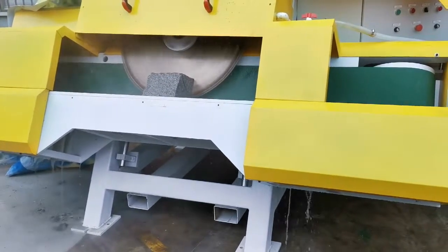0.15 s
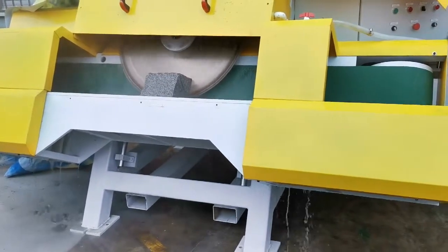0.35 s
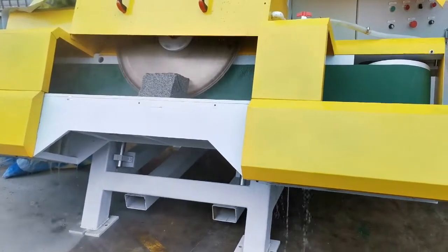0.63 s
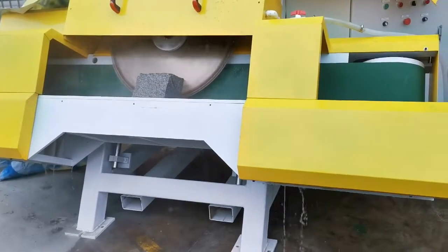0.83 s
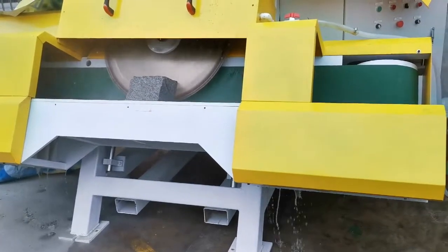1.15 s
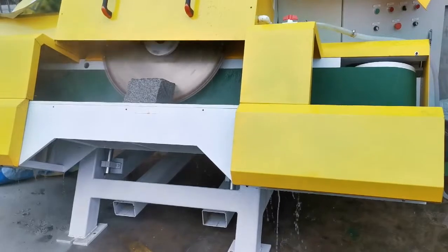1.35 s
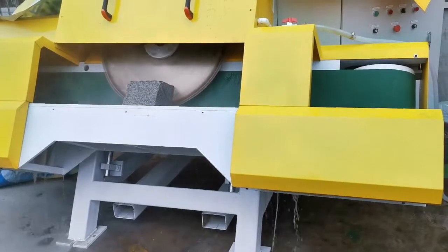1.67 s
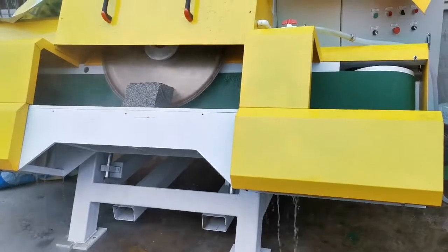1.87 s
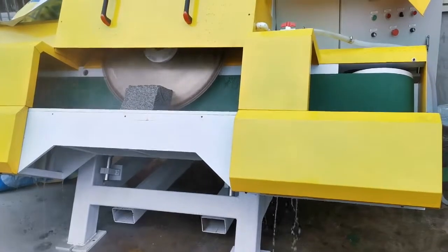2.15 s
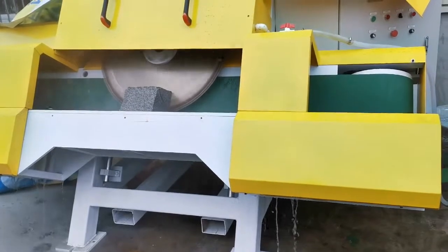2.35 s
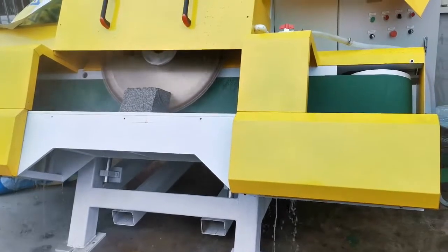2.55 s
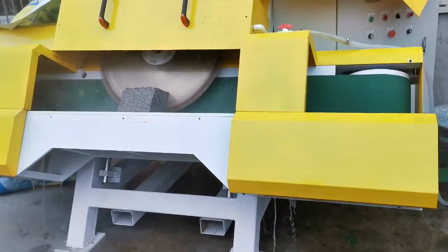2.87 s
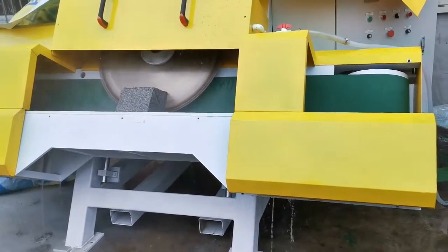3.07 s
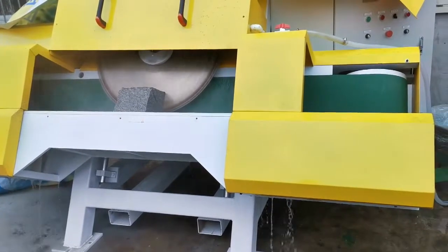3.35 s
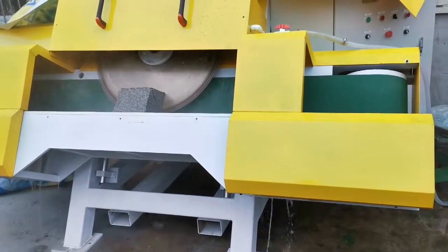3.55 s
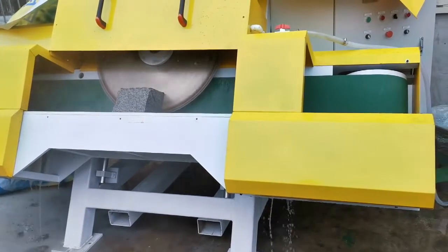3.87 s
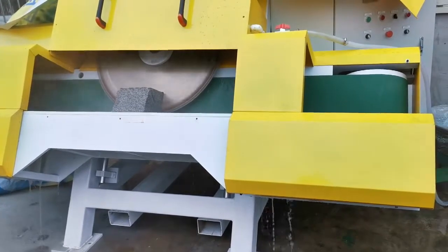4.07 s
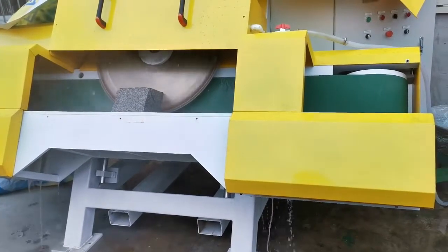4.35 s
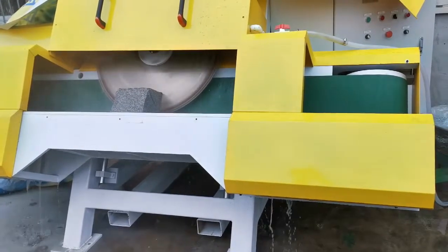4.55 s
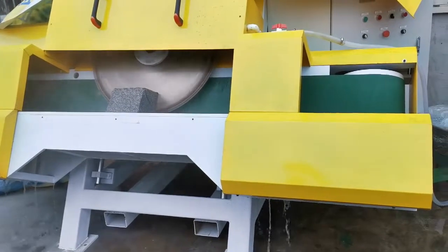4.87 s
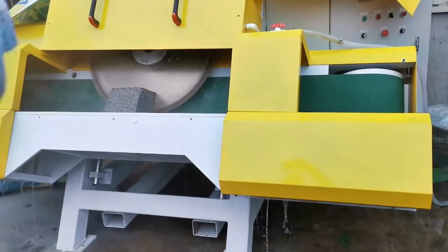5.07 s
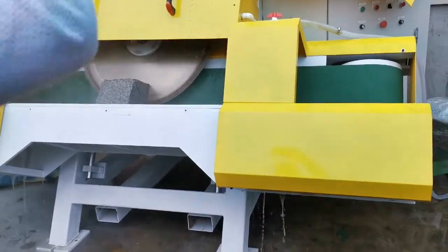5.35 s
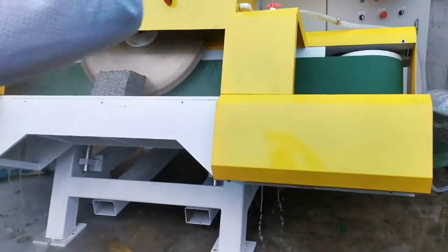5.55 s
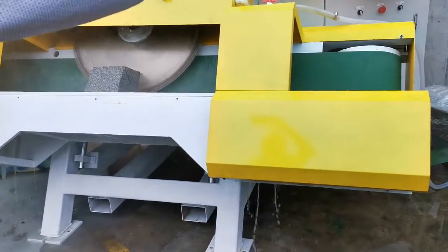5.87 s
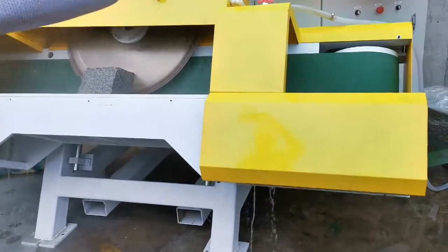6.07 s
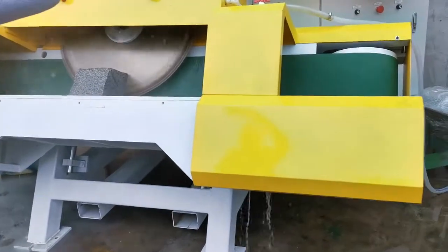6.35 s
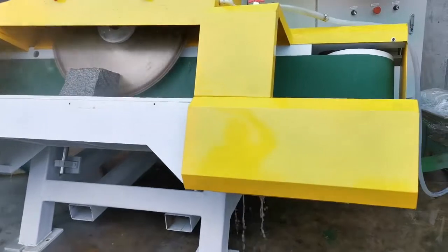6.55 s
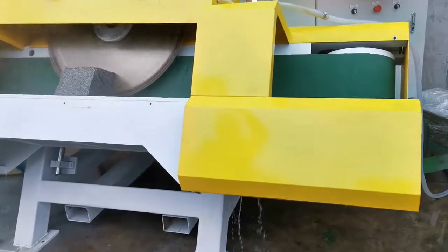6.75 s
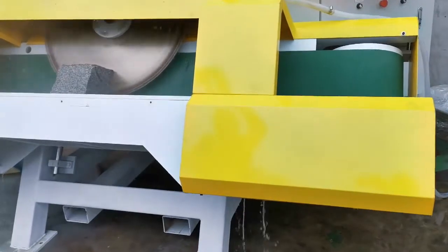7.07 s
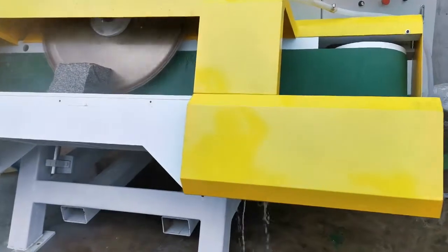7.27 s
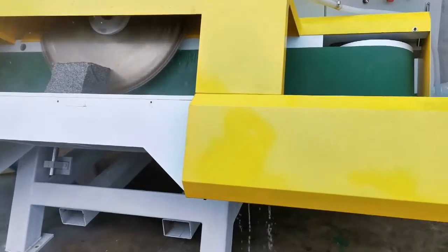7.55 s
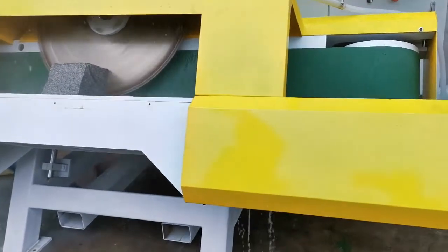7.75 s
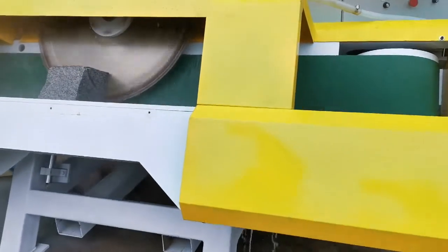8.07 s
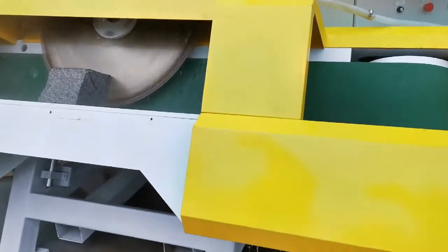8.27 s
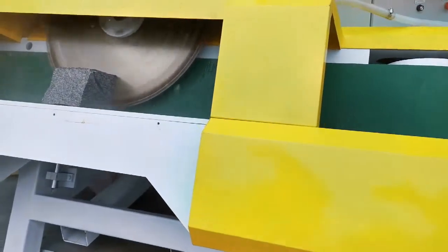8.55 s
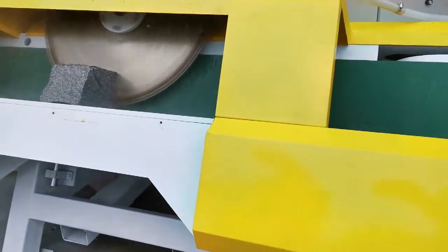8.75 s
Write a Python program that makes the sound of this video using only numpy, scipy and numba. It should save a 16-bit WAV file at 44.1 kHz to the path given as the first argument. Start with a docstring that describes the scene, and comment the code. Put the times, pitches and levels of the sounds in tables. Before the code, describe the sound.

Steady stone sawing from start to finish: a dense, harsh midrange rasp with whining, wavering metal resonances and a quick once-per-turn flutter. A soft low frame hum sits under it, with high water spray above and small dull thuds of wind or handling. The ringing grows more piercing in the later part. Close phone pickup in a factory hall, left side crisp, right side muffled.

```python
"""A large circular blade grinds through a wet stone block; its rim scrapes almost alike on every turn.
The scraping is noise that partly recurs each turn; it drives resonances of blade, guard and frame,
and steady tones sing out over them. Cooling water fizzes off the rim; low gusts and thuds rumble below.
Place: a factory hall. Microphone: a hand-held phone a metre away, its left port open to the treble,
its right port muffled but resonant."""
import sys
import numpy as np
from scipy import signal
from scipy.fft import rfft, irfft, next_fast_len
from scipy.io import wavfile
from scipy.ndimage import uniform_filter1d, map_coordinates
from numba import njit

SR = 44100
rng = np.random.default_rng(int(sys.argv[2]) if len(sys.argv) > 2 else 0)


def digitize_waveform(pressure):
    """Quantize a signal to 16-bit integers and store it at the path in sys.argv[1].

    Rows of a 2-D input are taken as channels; values are limited to [-1, 1].
    """
    field = np.atleast_2d(pressure).T
    bounded = np.clip(field, -1, 1)
    quanta = np.round(bounded * 32767).astype(np.int16)
    wavfile.write(sys.argv[1], SR, quanta)


N = 393372
TURN = 2651  # samples in one turn of the blade
HZ = np.fft.rfftfreq(2 * next_fast_len(N // 2 + 1, True), 1 / SR)  # filter bins


def undb(db):
    """Decibels to gain."""
    return 10 ** (np.asarray(db) / 20)


def curves(table):
    """Table columns at every sample."""
    s, *columns = np.transpose(table)
    return [np.interp(np.arange(N) / SR, s, c) for c in columns]


def over_hz(table):
    """Table columns at every frequency bin, straight lines over log frequency."""
    hz, *columns = np.transpose(table)
    return np.array([np.interp(np.log(HZ + 1), np.log(hz), c) for c in columns])


def shape(x, gain):
    """Filter by a gain for each frequency bin."""
    return irfft(rfft(x, 2 * len(HZ) - 2) * gain)[..., :N]


def below(hz):
    """Gain per bin of a steep low-pass."""
    return 1 / (1 + (HZ / hz) ** 16)


def unit(x):
    """Scale so that the mean of the channels has rms 1."""
    return x / np.sqrt(np.mean(np.mean(x, axis=0) ** 2))


def walk(rate):
    """Random levels held about 1 / rate s and slewed twice; spread near 1."""
    step = 64  # samples between computed points
    k = int(SR / rate / step)
    held = np.repeat(rng.standard_normal(N // step // k + 2), k)
    slow = 1.47 * uniform_filter1d(uniform_filter1d(held, k), k)
    return np.interp(np.arange(N) / step, np.arange(len(slow)), slow)


def swells(events, rest_db):
    """Gain over time: smooth humps on a resting level, summed as powers."""
    t = np.arange(0, N, 64) / SR
    power = undb(2 * rest_db)
    for middle, length, peak_db in events:
        hump = np.cos(np.pi * np.clip((t - middle) / length, -.5, .5)) ** 4
        power = power + undb(2 * peak_db) * hump
    return np.interp(np.arange(N) / SR, t, np.sqrt(power))


# Low gusts and thuds on the phone, before the lift of the deepest part.
# Each row: middle in seconds, length in seconds, peak level in dB.
GUSTS = [(.45, 0.091, -56), (.78, 0.65, -51), (1.1, 0.33, -58), (1.37, 0.45, -52), (1.55, 0.16, -54),
         (1.68, 0.32, -50.5), (1.87, 0.16, -56), (2.0, 0.13, -55), (2.2, .2, -57), (2.5, 0.75, -58.5),
         (2.88, 0.17, -57), (3.15, 0.1, -66), (4.18, 0.25, -56), (4.75, 1.1, -56.5), (5.45, .15, -59),
         (5.85, 0.98, -58.5), (6.1, 0.18, -59), (7.04, 0.19, -56), (7.33, 0.2, -56), (7.45, .12, -60),
         (7.72, 0.34, -58), (8.14, 0.3, -52), (8.46, 0.17, -55)]
# Colour of the rumble. Each row: frequency in Hz, relative level in dB.
RUMBLE_COLOUR = [(20, -15), (40, -8), (100, -1), (170, 0), (250, -10), (400, -35)]
# Lift of the deepest rumble. Each row: time in seconds, lift in dB.
DEEP_LIFT = [(0, 12), (1, -6), (2.8, -5), (3.45, 7), (4.1, 5), (5.5, 6), (7.9, 7), (8.9, -1)]


def rumble():
    """Low gusts and handling: noise partly shared by the ports, stronger on the left, deep and upper apart."""
    rest_db, flicker_db = -67.5, 0.5  # level between the gusts, spread of the flicker
    shared, left, right = shape(rng.standard_normal((3, N)), undb(over_hz(RUMBLE_COLOUR)[0]))
    both = unit(np.array([undb(1.0) * (shared + left), undb(-2.5) * (shared + right)]))
    deep = shape(both, 1 / (1 + (HZ / 60) ** 6))
    upper = both - deep
    deep_gain = undb(curves(DEEP_LIFT)[0] + flicker_db * walk(21))
    upper_gain = undb(flicker_db * walk(21))
    return swells(GUSTS, rest_db) * (deep * deep_gain + upper * upper_gain)


# Throb once a turn, before each layer's own scale. Each row: time in seconds, depth in dB.
BITE = [(0, 1.8), (1.5, 1), (2.8, 1.23), (3.5, 1.27), (4.6, 1.44), (5.4, -0.6), (6.4, 1.5), (7.7, 1.5),
        (8.2, 1), (8.9, 1.5)]


def throb(scale):
    """Gain of a blade slightly out of true, which bites harder once a turn; a second harmonic skews the bite."""
    depth_db = curves(BITE)[0]
    angle = 3.73 - 0.13 * np.arange(N) / SR  # rad; the hardest bite slips slowly round the turn
    turn = 2 * np.pi * np.arange(N) / TURN + angle
    return undb(scale * depth_db * (np.cos(turn) + 0.38 * np.cos(2 * turn + 0.28)))


# Colour of the water at the ports. Each row: frequency in Hz, left and right relative level in dB.
SPRAY_COLOUR = [(8000, -20, -30), (10500, -4, -20), (11500, -2, -18), (13000, -7, -23), (15000, -11, -33)]


def spray():
    """Cooling water flung off the rim: a fine high noise fizz, in bands of randomly wavering level."""
    out, colour = 0, undb(over_hz(SPRAY_COLOUR))
    for hz in (9500, 10800, 12100, 13400, 14700):
        band_gain = colour * np.exp(-((HZ - hz) / 900) ** 2)
        band = shape(rng.standard_normal((2, N)), band_gain)
        out = out + band * undb(1.1 * walk(10) + 2.7 * walk(30))
    level_db = np.linspace(-55.5, -58.5, N)
    return unit(out) * undb(level_db) * throb(1.3)


# Turn orders that sound beside a tone. Each row: offset in orders, relative level in dB.
NEIGHBOURS = [(-2, -9), (-1, -4), (1, 0), (2, -5), (3, -10)]


def beating(rough):
    """Complex gain of a tone with neighbouring turn orders, drifting in phase, so it flutters once a turn."""
    at = np.arange(0, N + 32, 32)
    order, db = np.transpose(NEIGHBOURS)
    steps = rng.standard_normal((len(NEIGHBOURS), len(at)))
    start = 2 * np.pi * rng.random((len(NEIGHBOURS), 1))
    drift = np.cumsum(steps, axis=1) * .09 + start
    orders = np.exp(1j * (2 * np.pi * np.outer(order, at) / TURN + drift))
    near = undb(db) @ orders / np.linalg.norm(undb(db))
    return np.interp(np.arange(N), at, np.sqrt(1 - rough) + np.sqrt(rough) * near)


# Steady tones of frame and blade, and a low hum at 99.8 Hz. Each row: frequency in Hz, left minus right in dB,
# phase wander in rad, how strongly it follows the bite (exponent), share of neighbouring turn orders 0-1.
TONES = [(266.1, 6.3, .8, 1.6, 0), (299.4, 6, .9, 1.6, 0), (365.9, 7.4, 1.3, 1, .15),
         (598.8, 4.4, 1., 1, 0), (731.9, 1.6, .6, .8, .1), (1330.6, -.6, 1.4, 1., .25),
         (2163.6, -4.3, 2., 1.6, .25), (2362.1, -6.7, 3.5, 1.8, .6), (3478.5, -11, 4.5, 4.5, .35),
         (3678.7, -10.3, 2.5, .8, .2), (4521.5, -11.5, 8., 3, .6), (99.8, 4, .8, 1, 0),
         (3040, -10, 4., 3.5, .4), (3550, -10, 4.5, 3.5, .4), (1064.6, 1, 1., 1, .2),
         (4620, -10, 6., 3, .7), (5390, 3, 6., 4.5, .3), (2415, -7, 3., 2.5, .7), (2510, -7, 4., 3.5, .4),
         (2931, -9, 2., 2, .4), (2665, -8, 3., 2, .6), (3245, -10, 3., 4, .3), (4860, -6, 7., 3, .8),
         (4975, -3, 7., 3, .8), (4378, -11, 5., 2.5, .6), (2778, -6, 4., 2.5, .6), (3876, -10, 4., 2.5, .5),
         (1763.3, 1.5, 1.5, 1, .2), (1896.4, -2, 1.5, 1, .2), (6458, 15, 3., 1, .3)]
# Level of each tone in turn between its swells, in dB, before throb and flicker.
TONE_REST_DB = [-62, -60, -71, -58, -83, -67.5, -54, -49.5, -58, -60, -66, -80, -70, -69, -70, -71, -53.5,
                -50, -55, -67, -46, -79, -66, -55, -64, -52, -50, -73, -53.5, -113]
# One list of swells for each tone in turn, before throb and flicker.
# Each row: middle in seconds, length in seconds, peak level in dB.
TONE_SWELLS = [
    [(.4, 0.31, -50), (1.35, 0.27, -50), (2.1, 0.95, -52), (4.3, 4.1, -51), (7, 1.3, -57.5),
     (7.9, 1.4, -55)],
    [(1.85, 0.77, -55), (3.9, 0.72, -59), (5.8, 1., -53), (7.7, 1.9, -51.5)],
    [(2, 2.5, -52), (3.8, 2.4, -50.5), (4.8, 3.3, -50.5), (5.5, 0.51, -53), (6.25, 0.82, -53),
     (7.7, 0.63, -53)],
    [(.3, 1., -66), (2, 1.9, -49.5), (2.75, 1.8, -51.5), (4.1, 0.97, -53), (4.8, 0.85, -54.5),
     (7.5, 1, -61)],
    [(.3, 2.7, -50), (1.75, 1.8, -54.5), (3.1, 2.2, -60), (4.1, 1.2, -56), (4.9, 1.2, -54), (5.7, 1.1, -53),
     (7.5, 1.2, -51)],
    [(.5, 2.1, -51.5), (3.75, 1.1, -56), (4.5, 0.41, -50), (7.4, 5.5, -53)],
    [(2.2, 1.5, -46.5), (4.2, 0.75, -47), (5.7, 0.56, -42), (6.3, .5, -46), (8.2, 0.75, -44),
     (8.8, 0.94, -39)],
    [(1.0, 1.8, -45), (1.6, 1.4, -42), (2.1, 1.2, -42), (2.5, 0.77, -42.5), (3.9, 2.1, -43),
     (5.3, 0.76, -47), (5.75, 0.6, -40), (6.25, 1.1, -34.5), (7.65, 0.6, -39), (8.5, 0.98, -47)],
    [(1.8, .6, -49), (3.7, .5, -42), (6.5, 0.73, -41), (7.03, 0.24, -36.5), (7.45, 0.33, -42),
     (7.7, 0.49, -37), (8.4, 0.42, -38)],
    [(5.85, .6, -43), (6.5, .9, -39), (7.0, .6, -39), (7.3, 0.7, -36), (7.58, 0.65, -34), (8.0, 0.5, -39)],
    [(.4, 1.1, -48), (1.5, 0.73, -40.5), (3.1, 3.5, -41), (3.9, 0.79, -42), (4.4, 1.7, -45),
     (5, 1.5, -40.5), (5.8, 0.27, -41), (7.5, 0.54, -57)],
    [(.75, 0.65, -63), (2.2, 0.58, -62), (4.7, 1.7, -61.5), (5.9, 1.75, -60.5), (8.1, 0.55, -67)],
    [(2.7, 1.5, -54), (4.2, 1.2, -58), (6., 1.9, -41), (8.2, 1.3, -44)],
    [(1.5, 1.4, -48), (4., 0.75, -50), (6.95, 0.85, -41), (7.6, 0.8, -39), (8.45, 0.51, -39)],
    [(3.8, .6, -54), (4.7, 1.2, -62), (5.4, 1, -57)],
    [(3, 1.7, -39.5), (7.4, 0.56, -56)],
    [(3, .8, -66.5), (7.1, 1, -50), (8, 1, -42), (8.5, 0.57, -40.5), (8.85, 0.52, -43)],
    [(1., .8, -46), (1.9, 0.93, -43)],
    [(1.7, 1.2, -48), (5.65, 0.72, -48), (8.1, 0.46, -38.5), (8.45, 0.75, -44.5), (8.85, .3, -51)],
    [(8.15, .5, -46), (8.5, 0.32, -40), (8.7, 0.18, -45)],
    [(2.35, .4, -43), (5.9, 0.59, -44), (6.9, 0.41, -49), (8.8, 0.44, -43)],
    [(7.05, 0.66, -43), (7.7, 0.79, -39.5)],
    [(2.8, 0.27, -44), (3.1, 0.7, -40), (8.1, .5, -48)],
    [(2.8, 0.2, -41), (3.1, 0.44, -43)],
    [(2, 1., -45), (3., 1, -47), (3.6, 0.53, -43), (5.8, .6, -51.5)],
    [(.2, 1.24, -42)],
    [(1.3, 1.2, -46), (2.4, 0.87, -43), (4.2, 1, -45)],
    [(.5, 1.2, -61), (6.4, 0.64, -51), (7.7, .9, -52), (8.5, 1.2, -55)],
    [(.3, 0.77, -55), (1.5, .9, -56), (7., 3., -62)],
    [(6.8, 1.5, -55), (8., 2.5, -45)],
]


def tones(lag_ms):
    """Sine tones of frame and blade, and a low hum, sing out; the phase wanders, a little differently at each
    port."""
    out, t, turn = 0, np.arange(N) / SR, throb(0.74)
    for tone, events, rest_db in zip(TONES, TONE_SWELLS, TONE_REST_DB):
        hz, pan_db, wander, bite, rough = tone
        left = 2 * np.pi * hz * t + wander * walk(6)
        right = left - 2 * np.pi * hz * lag_ms / 1000 + 0.17 * wander * walk(4)
        phases = np.array([left, right])
        wave = np.imag(beating(rough) * np.exp(1j * phases))
        wave = unit(wave * undb([[pan_db], [0]]))
        out = out + swells(events, rest_db) * turn ** bite * undb(1.35 * walk(15)) * wave
    return out


def recurring(memory):
    """Noise of which each turn keeps a part of the turn before."""
    turns = rng.standard_normal((N // TURN + 1, TURN))
    turns[1:] *= np.sqrt(1 - memory ** 2)
    for k in range(1, len(turns)):
        turns[k] += memory * turns[k - 1]
    return turns.ravel()[:N]


# Scraping that comes back turn after turn.
# Each row: frequency in Hz, power share returning for many turns, power share returning for a few.
REPEAT = [(300, 0.58, 0.02), (760, 0.19, 0.15), (1540, 0.042, 0.5), (2500, 0.35, 0.42), (3960, 0.16, 0.25),
          (5860, 0.039, 0.069), (9050, 0.12, 0.11), (12000, 0.01, 0.01)]


def scraping():
    """Rim on stone: the shape of the rim returns, wet grit returns briefly, the rest is new noise."""
    many, few = np.clip(over_hz(REPEAT), 0, .99)
    new = np.clip(1 - many - few, 0, 1)
    rim = shape(recurring(0.936), np.sqrt(many))
    grit = shape(recurring(0.65), np.sqrt(few))
    return rim + grit + shape(rng.standard_normal(N), np.sqrt(new))


# How alike the scraping is at the two ports. Each row: frequency in Hz, likeness 0-1.
LIKENESS = [(100, 0.9), (500, 0.38), (1200, 0.51), (2300, 0), (3500, 0.77), (5000, 0), (6500, 0.28)]


def scraping_at_ports(lag_ms):
    """The right port hears the scraping later; the left one also gets what the hall returns, as other noise."""
    direct, hall = scraping(), scraping()
    heard_at = np.arange(N) - lag_ms * SR / 1000
    late = map_coordinates(direct, [heard_at], order=3, mode="nearest")
    like = np.clip(over_hz(LIKENESS)[0], 0, 1)
    left = shape(direct, like) + shape(hall, np.sqrt(1 - like ** 2))
    return np.array([left, late])


# Ringing modes of the blade. Each row: frequency in Hz, width in Hz, left and right relative level in dB.
BLADE = [(2000, 35, -18, -15), (2096, 35, -18, -10), (2162, 25, -18, -12), (2291, 35, -20, -12),
         (2372, 45, -13, -5), (2430, 35, -17, -8), (2516, 55, -17, -6), (2650, 40, -18, -9),
         (2719, 45, -16, -7), (2785, 45, -17, -9), (2936, 35, -19, -11), (3027, 60, -16, -5),
         (3190, 45, -21, -9), (3252, 45, -18, -8), (3343, 45, -17, -10), (3480, 50, -18, -7),
         (3555, 45, -19, -7), (3693, 45, -19, -5), (3750, 50, -20, -7), (3876, 55, -20, -7),
         (3945, 35, -22, -9), (4058, 40, -18, -7), (4121, 35, -18, -3), (4212, 40, -23, -9),
         (4375, 50, -20, -5), (4512, 55, -18, -7), (4616, 50, -16, -9), (4741, 40, -20, -14),
         (4894, 55, -14, -13), (5065, 35, -19, -16), (5115, 35, -18, -19), (5269, 50, -15, -19),
         (5339, 35, -17, -21), (5402, 45, -18, -18), (5485, 35, -23, -22), (5838, 19, -15.9, -22.1),
         (6070, 13, -21.0, -29.0), (6274, 44, -18.1, -31.5), (6460, 16, -19.2, -52.5),
         (6829, 21, -17.3, -57.3), (7197, 45, -14.0, -51.0), (7453, 24, -12.8, -54.4),
         (7566, 24, -13.7, -54.6), (8053, 45, -11.0, -57.5), (8341, 26, -11.7, -59.0),
         (8810, 45, -11.7, -60.1), (9004, 45, -12.5, -59.1), (9238, 34, -13.7, -60.4),
         (9771, 24, -21.9, -59.4), (10912, 29, -27.7, -60.8)]
# Ringing modes of the frame. Each row: frequency in Hz, width in Hz, left and right relative level in dB.
FRAME = [(269, 40, -17.0, -23.2), (401, 8, -20.3, -30.7), (740, 50, -20, -21), (852, 60, -15, -23),
         (945, 50, -22, -29), (1060, 25, -26, -30), (1145, 55, -23, -24), (1243, 30, -26, -24),
         (1334, 30, -22, -21), (1447, 40, -24, -25), (1563, 55, -17, -18), (1630, 35, -19, -20),
         (1759, 30, -18, -17), (1821, 35, -20, -17), (1895, 20, -20, -16), (1938, 30, -20, -17)]


def ringing(force, waver_db, flicker_db):
    """Every mode rings in both ports; its level wanders at random."""
    out = 0
    for hz, width, left_db, right_db in BLADE + FRAME:
        # two passes of a wider resonance: the stated width with steep skirts, so the gaps stay dark
        peak = signal.iirpeak(hz, hz / width * np.sqrt(np.sqrt(2) - 1), fs=SR)
        ring = signal.sosfilt([np.concatenate(peak)] * 2, force)
        wander = undb(waver_db * walk(2.61) + flicker_db * walk(10))
        out = out + ring * wander * undb([[left_db], [right_db]])
    return out


# How sharply lesser modes stand out. Each row: frequency in Hz, sharpness 0-1.
CROWD = [(600, .4), (5400, .4), (6000, 1.), (12000, 1.)]


def small_modes(spacing_hz, width_hz, spread_db):
    """Gain per bin of the crowd of lesser modes, one placed by chance in every stretch of spacing_hz."""
    place, strength = rng.random((1000, 2)).T
    at = ((np.arange(len(place)) + place) * spacing_hz / HZ[1]).astype(int)
    peaks = np.zeros(at[-1] + len(HZ))
    peaks[at] = undb(2 * spread_db * strength)
    near = HZ[HZ < 400]
    skirt = 1 / (1 + (2 * np.r_[near[:0:-1], near] / width_hz) ** 2)
    power = signal.fftconvolve(peaks[:len(HZ)], skirt, mode="same") + 1e-3
    return (power / np.mean(power)) ** (np.clip(over_hz(CROWD)[0], 0, 1) / 2)


@njit
def moving_resonance(x, hz, width):
    """State-variable band-pass with a moving centre, gain 1 there."""
    y, band, low = np.empty(len(x)), 0., 0.
    for i in range(len(x)):
        g, k = np.tan(np.pi * hz[i] / SR), width / hz[i]
        v = (band + g * (x[i] - low)) / (1 + g * (g + k))
        band, low, y[i] = 2 * v - band, low + 2 * g * v, k * v
    return y


def patchy(x, edges, depth_db):
    """The level of each band between the edges (Hz) wanders at random."""
    under = [0] + [below(hz) for hz in edges] + [1]
    return sum(shape(x, hi - lo) * undb(depth_db * walk(6.4)) for lo, hi in zip(under, under[1:]))


# The cut, before the lean of the blade. Each row: time in seconds, level of the blade's body in dB,
# centre of the loudest ringing in Hz, level of the upper modes in dB.
CUT = [(0.1, -31.5, 3160, -34), (0.8, -31.5, 3330, -36.5), (2.14, -30.5, 3360, -35.5),
       (2.29, -31.5, 3240, -36), (3.1, -34.5, 2930, -34.5), (3.66, -32.5, 3240, -36.5),
       (4.56, -31.5, 3100, -39.5), (5.09, -32.5, 3630, -39.5), (5.36, -32.5, 3620, -42),
       (5.48, -31.5, 3350, -39), (5.83, -29, 3430, -35.5), (5.95, -33, 3060, -39.5), (6.05, -29, 3180, -36),
       (6.66, -30, 3540, -35.5), (6.85, -31, 3340, -38), (7.53, -29.5, 3480, -36),
       (8.17, -30.5, 3000, -37.5), (8.56, -31.5, 3420, -37.5), (8.8, -32.5, 2830, -39),
       (8.85, -31.5, 2930, -42)]
# The hand turns the phone. Each row: time in seconds, lean of the blade to the left in dB,
# lag of the right port in ms.
PHONE = [(0, 1.5, 0.16), (2.5, 2.5, 0.19), (5, 1.5, 0.21), (5.6, -0.5, 0.24), (6.6, 4.5, 0.28),
         (8.9, 5, 0.28)]
# Scraping between the modes. Each row: frequency in Hz, left and right relative level in dB.
HISS = [(61, -26, -30), (480, -24, -30), (740, -23, -28), (900, -29, -35), (1300, -33, -33),
        (1870, -28, -27), (2520, -23, -17), (3900, -26, -15), (4510, -25, -17), (5000, -27, -28),
        (5550, -30, -33), (6130, -30, -41), (8600, -17, -52), (10230, -30, -55), (11500, -38, -58),
        (15400, -40, -79)]
# The frame's hum. Each row: time in seconds, level in dB.
FRAME_LEVEL = [(0.1, -49.5), (1.17, -45), (1.88, -46.5), (3.52, -48.5), (4.09, -47.5), (6.21, -46.5),
               (6.36, -54), (7.7, -46), (8.52, -48.5), (8.58, -60), (8.83, -54), (8.88, -51.5)]
# The guard's ringing. Each row: time in seconds, level in dB.
GUARD_LEVEL = [(0.1, -45.5), (0.37, -44.5), (1.24, -47.5), (1.37, -45), (5.22, -47), (6.1, -45.5),
               (6.7, -47), (7.63, -43.5), (8.61, -46.5), (8.65, -44.5), (8.85, -46)]


def saw():
    """Blade, guard and frame driven by the scraping, as the two ports hear them."""
    body_db, loud_hz, upper_db = curves(CUT)
    lean_db, lag_ms = curves(PHONE)
    force = scraping_at_ports(lag_ms)
    under = [below(hz) for hz in (170, 780, 1650, 4200, 6300, 11000)]

    # the frame and the finest grit follow the bite less
    bite = throb(1.22) * undb(0.074 * walk(2.8) + 1.06 * walk(20))
    low = shape(force, under[2]) * throb(1.0)
    middle = shape(force, under[4] - under[2]) * bite
    fine = shape(force, 1 - under[4]) * throb(0.82)
    force = low + middle + fine

    crowd = small_modes(spacing_hz=65, width_hz=18, spread_db=5)
    rings = ringing(force, waver_db=1.5, flicker_db=1.8)
    rings[1] = shape(rings[1], under[4])  # the muffled port loses the treble
    # a quarter cycle between scraping and ringing lets them add without cancelling in the gaps
    hiss = shape(force, 1j * undb(over_hz(HISS)) * crowd)
    sound = hiss + undb(-4.5) * rings
    frame, guard, body, upper, treble = (shape(sound, hi - lo) for lo, hi in zip(under, under[1:]))

    # the group of modes that rings loudest moves during the cut
    body = body + .8 * np.array([moving_resonance(port, loud_hz, 450.) for port in body])
    blade = unit(body) * undb(body_db) + unit(upper) * undb(upper_db)
    blade = blade * undb([lean_db / 2, -lean_db / 2])
    frame = unit(patchy(frame, (330, 455, 566, 640), depth_db=1.0)) * undb(curves(FRAME_LEVEL)[0])
    guard = unit(patchy(guard, (944, 1070, 1200, 1400), depth_db=1.5)) * undb(curves(GUARD_LEVEL)[0])
    treble = unit(treble) * undb(-36.5 + 0.5 * walk(4.03))
    return blade + frame + guard + treble + tones(lag_ms)


def scene():
    """The rumble on the phone, the water, and the saw a metre away."""
    return rumble() + spray() + saw()


def record(dry):
    """The phone cuts the top steeply above 15150 Hz."""
    return signal.sosfilt(signal.ellip(16, .3, 80, 15150, fs=SR, output="sos"), dry)


dry = scene()
out = record(dry)
digitize_waveform(out)
```